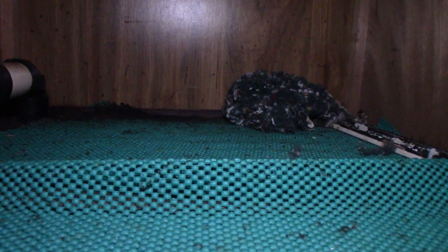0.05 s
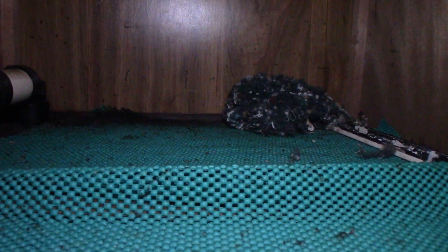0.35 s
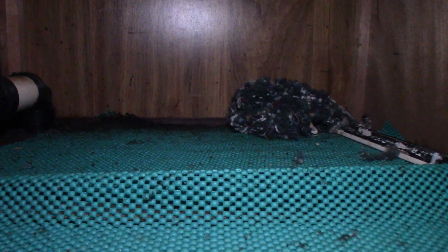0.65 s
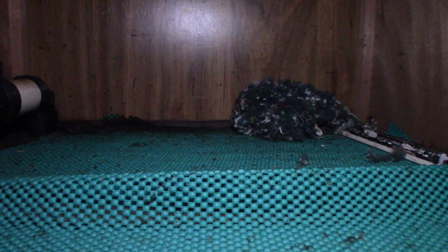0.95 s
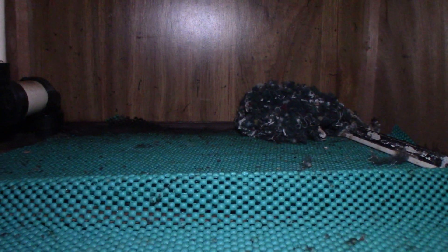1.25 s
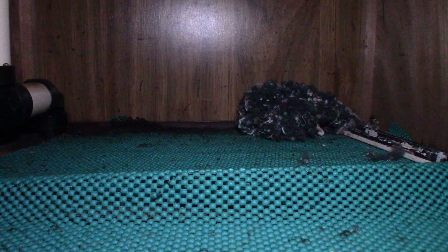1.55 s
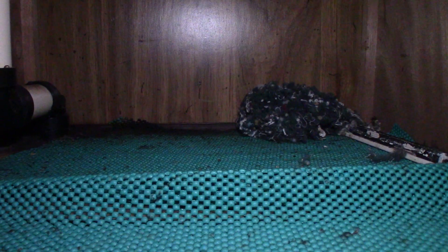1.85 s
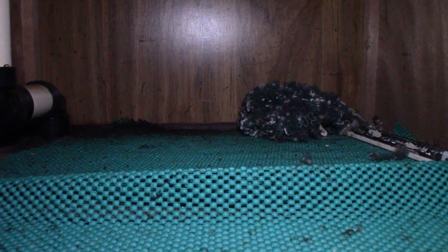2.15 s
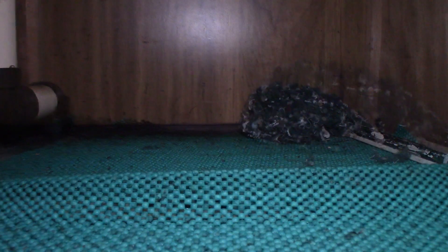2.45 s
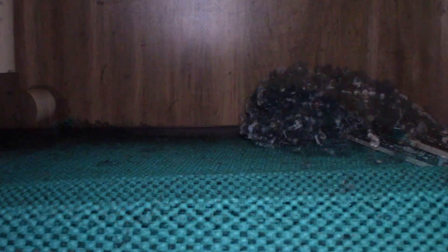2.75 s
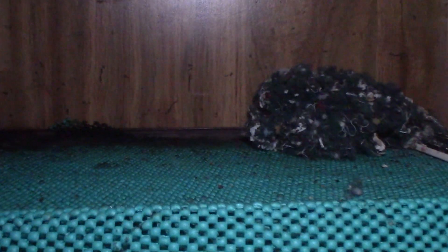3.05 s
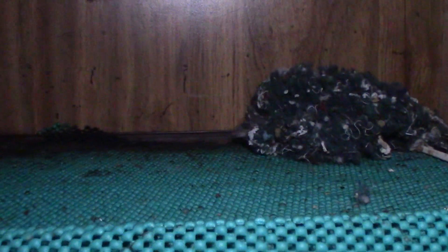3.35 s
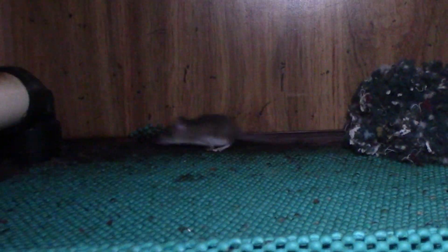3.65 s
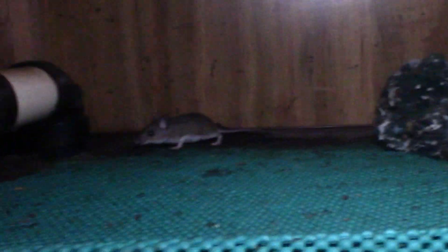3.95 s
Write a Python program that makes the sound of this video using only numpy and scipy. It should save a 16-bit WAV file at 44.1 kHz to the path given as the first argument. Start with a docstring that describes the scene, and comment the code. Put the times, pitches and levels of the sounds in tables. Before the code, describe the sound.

Hands shift a camera, with rumbling, scraping, clicks and a thump right at the microphone, mostly left. The quiet wooden room hums underneath. The handling settles, a few faint mouse steps pass, and a last bump jolts the camera.

```python
"""Camera handling in a wooden cabin

Hands shift a camera in a small wooden cabin: its plastic body rumbles, rubs and clicks near the left
microphone, and close walls scatter the sound. Quiet room noise and a low hum lie underneath.
A mouse patters faintly along the wall; at the end a bump shakes the camera and its support."""
import sys
import numpy as np
from scipy import signal
from scipy.fft import rfft, irfft
from scipy.io import wavfile
from scipy.ndimage import uniform_filter1d, minimum_filter1d

SR = 44100
rng = np.random.default_rng(int(sys.argv[2]) if len(sys.argv) > 2 else 0)


def wav_out(sig):
    """Save sig, one row per channel (or a flat mono array), as 16-bit PCM at SR to the path in sys.argv[1]."""
    wavfile.write(sys.argv[1], SR, np.round(np.clip(np.atleast_2d(sig).T, -1, 1) * 32767).astype(np.int16))


N = 176400
RING_SAMPLES = 13230
ROOM_PAN_DB = 3.5
# Modes of the plastic body. Each row: frequency in Hz, level in dB, T60 in seconds.
BODY_MODES = [(269, 3.5, 0.03), (328, 6, 0.03), (525, 3.5, 0.015), (835, 3, .019), (1117, 0.5, .02),
              (1400, -0.5, 0.013), (1810, -7, 0.012), (2600, -0.5, 0.0088), (3200, 5.5, 0.0065),
              (3600, -12.5, .017), (4460, -10.5, 0.013), (6600, 6, 0.0029)]


def undb(db):
    """Decibels to gain."""
    return 10 ** (np.asarray(db) / 20)


def unit(x):
    """Scale to rms 1."""
    return x / np.sqrt(np.mean(x ** 2) + 1e-20)


def decay(t, t60_s):
    """Exponential fall, 60 dB per t60_s."""
    return np.exp(-np.log(1000) * t / t60_s)


def pan(db):
    """Channel gains for left minus right in dB."""
    gains = undb(np.array([[db], [-db]]) / 2)
    return gains / gains.mean()


def add(out, start_s, x):
    """Mix x in at start_s."""
    i = max(int(start_s * SR), 0)
    out[:, i:i + x.shape[-1]] += x[..., :max(N - i, 0)]


def butter(x, order, hz, kind="low"):
    """Butterworth filter."""
    return signal.sosfilt(signal.butter(order, hz, kind, fs=SR, output="sos"), x)


def band(x, low_hz, high_hz, skirt_db=-17):
    """Band-pass with a weak, broad skirt."""
    top_hz = min(max(high_hz, low_hz * 1.1), SR / 2.2)
    skirt_hz = [low_hz / 4, min(top_hz * 2.2, SR / 2.2)]
    return butter(x, 2, [low_hz, top_hz], "band") + undb(skirt_db) * butter(x, 2, skirt_hz, "band")


def colour(x, points):
    """Filter by (Hz, dB) points; 12 dB/octave roll-off below the first."""
    hz, db = np.array(points).T
    f = np.maximum(np.fft.rfftfreq(N, 1 / SR), 1)
    gain = undb(np.interp(np.log(f), np.log(hz), db)) * np.minimum(f / hz[0], 1) ** 2
    return irfft(rfft(x) * gain, N)


def stereo_noise(count, apart_db):
    """Shared noise plus an independent part per channel at apart_db."""
    return unit(rng.standard_normal(count) + undb(apart_db) * rng.standard_normal((2, count)))


def through(x, response):
    """Convolve both channels, keeping the length."""
    return signal.fftconvolve(x, np.atleast_2d(response), axes=1)[:, :x.shape[1]]


def ring(modes):
    """Impulse response of decaying modes."""
    t = np.arange(RING_SAMPLES) / SR
    return sum(undb(db) * decay(t, t60_s) * np.cos(2 * np.pi * hz * t) for hz, db, t60_s in modes)


def hit_level(x, db):
    """Scale a hit to the energy of 2 ms at db rms."""
    return unit(x) * np.sqrt(0.002 * SR / x.shape[-1]) * undb(db)


def grip(at_s):
    """Channel gains for the finger position."""
    # Each row: time in seconds, left minus right in dB.
    sides = [(1.4, 7.5), (1.8, 10), (2.25, 10), (3.9, 2)]
    return pan(np.interp(at_s, *np.array(sides).T))


def body_response(tick_db=32.5, top_hz=10700):
    """A tick and the brief ring of the plastic, which damps the top treble."""
    response = ring(BODY_MODES)[:RING_SAMPLES // 4]
    response[0] = response[0] / 2 + undb(tick_db)
    return butter(response, 2, top_hz)


def wall_response(bass_t60_s=0.11, treble_t60_s=0.055, rise_s=0.00053):
    """Short scatter between close wooden walls; treble dies first."""
    t = np.arange(RING_SAMPLES // 2) / SR
    noise = stereo_noise(len(t), apart_db=4)
    dull = butter(noise, 1, hz=6000)
    scatter = dull * decay(t, bass_t60_s) + (noise - dull) * decay(t, treble_t60_s)
    return unit(scatter * (1 - np.exp(-t / rise_s))) / np.sqrt(len(t))


def room(t, air_db=-47.5, diffuse_hz=3200, hum_hz=77):
    """Quiet air, shared in the bass and diffuse in the treble, with a low hum."""
    # Each row: frequency in Hz, relative spectral density in dB.
    air_spectrum = [(71, -29), (120, -10), (150, -1.5), (267, -2), (321, -3.5), (427, -4), (524, -6),
                    (580, -7), (14400, -31.5), (16000, -42)]
    # Each row: time in seconds, level in dB.
    hum_levels = [(0, -72), (1.1, -45.5), (2.5, -48), (3.1, -45.5), (3.75, -36.5), (4, -42)]
    f = np.fft.rfftfreq(N, 1 / SR)
    diffuse_share = np.clip(0.089 + 0.4 * f ** 1.659 / (f ** 1.56 + diffuse_hz ** 1.5), 0, 1)
    shared = rfft(rng.standard_normal(N)) * np.sqrt(1 - diffuse_share)
    diffuse = rfft(rng.standard_normal((2, N))) * np.sqrt(diffuse_share)
    air = unit(colour(irfft(shared + diffuse, N), air_spectrum)) * undb(air_db)
    hum = np.sin(2 * np.pi * hum_hz * t) * undb(np.interp(t, *np.array(hum_levels).T))
    return (air + hum) * pan(ROOM_PAN_DB)


def rumble(t):
    """The held camera trembles."""
    # Each row: time in seconds, level in dB.
    levels = [(0, -38.5), (.45, -41.5), (.62, -48), (.78, -33.5), (1.15, -36.5), (1.55, -43.5),
              (1.8, -29.5), (2.1, -33.5), (2.25, -32), (2.5, -35), (2.76, -43.5), (2.88, -33),
              (3.12, -37.5), (3.35, -41), (4, -37)]
    # Each row: frequency in Hz, relative level in dB.
    spectrum = [(12, -2.5), (22, 4), (37, 2.5), (55, -7.5), (80, -7.5), (120, -14.5), (200, -26),
                (500, -62.5)]
    tremble = unit(colour(stereo_noise(N, apart_db=-4.5), spectrum))
    return tremble * undb(np.interp(t, *np.array(levels).T)) * pan(db=3)


def stick_slip(x, t, centre_hz=706.5, drift_depth=0.11, drift_hz=2.9, repeat_gain=0.55):
    """Each catch recurs one slip later; the slip rate drifts along the stroke."""
    slip_hz = centre_hz * np.exp(drift_depth * np.sin(2 * np.pi * (drift_hz * t + rng.random())))
    return x + repeat_gain * np.array([np.interp(t - 1 / slip_hz, t, side) for side in x])


def rubs(walls, grains_per_s=700, grain_spread_db=4.5, echo_db=-6.5):
    """Sliding skin catches in dense, uneven grains that ring the body and the walls."""
    # Each row: start in seconds, length in seconds, level in dB, low and high edge in Hz.
    strokes = [(0, 0.48, -55, 2200, 6960), (0.4, 0.66, -55.5, 2240, 6000), (0.175, 0.086, -37.5, 213, 390),
               (0.15, 0.24, -62.5, 6760, 8250), (0.677, 0.16, -36, 217, 370),
               (0.715, 0.041, -53, 6000, 13000), (0.731, 0.051, -43, 5370, 7250),
               (0.768, 0.069, -38.5, 500, 3200), (0.81, 0.17, -50.5, 1490, 10000),
               (0.717, 0.32, -39.5, 62.7, 160), (1.301, 0.077, -40.5, 680, 6000),
               (1.441, 0.044, -41.5, 200, 4930), (1.606, 0.32, -45.5, 500, 6000),
               (1.658, 0.073, -38, 1180, 4960), (1.687, 0.1, -50.5, 4500, 13000),
               (1.73, 0.17, -36.5, 170, 594), (1.967, 0.078, -39, 273, 1950),
               (2.123, 0.062, -49, 900, 8000), (2.177, 0.15, -40.5, 195, 1900),
               (2.429, 0.048, -44.5, 490, 4840)]
    out, t, body = np.zeros((2, N)), np.arange(SR) / SR, body_response()
    for start_s, length_s, db, low_hz, high_hz in strokes:
        grain_db = grain_spread_db * np.clip(rng.standard_normal(SR), -2, 2)
        friction = stereo_noise(len(t), apart_db=-3) * undb(grain_db[(t * grains_per_s).astype(int)])
        scrape = through(stick_slip(friction, t), body)
        scrape = scrape + undb(echo_db) * through(scrape, walls)
        attack = np.clip(t / (0.1 * length_s), 0, 1)
        release = np.clip((length_s - t) / (0.34 * length_s), 0, 1)
        stroke = unit(band(scrape, low_hz, high_hz)) * attack * release
        add(out, start_s, stroke * undb(db) * grip(start_s))
    return out


def clicks(walls, chatter_db=-11.5, chatter_s=0.0012):
    """Each contact chatters briefly, rings the body and rattles between the walls."""
    # Each row: start in seconds, level in dB, low and high edge in Hz, rattle over direct in dB.
    contacts = [(0.7514, -25.5, 3780, 6600, 1), (0.7694, -29, 2470, 5700, -11),
                (0.831, -24.5, 910, 2650, 25), (0.911, -17, 1190, 2610, 1.5), (1.117, -26.5, 490, 1980, 12),
                (1.178, -38.5, 600, 4000, 8), (1.3072, -27.5, 600, 2800, 16),
                (1.3725, -23.5, 1280, 5470, 0.5), (1.422, -26.5, 1400, 6900, -7),
                (1.4455, -24, 790, 1230, -2.5), (1.496, -33, 910, 4000, 11),
                (1.655, -39.5, 2000, 13000, -20), (1.6599, -23, 660, 1670, 32),
                (1.713, -28.5, 876, 3440, 10), (1.7564, -22.5, 600, 3130, -4), (1.765, -21, 2500, 4800, -9),
                (1.798, -15.5, 570, 950, -25), (1.811, -10.5, 2690, 6200, -7),
                (1.895, -36.5, 3760, 14600, 2.5), (2.007, -31.5, 1200, 7200, 1),
                (2.043, -34, 1500, 4970, -3), (2.0754, -13, 3480, 6900, -11.5), (2.129, -19, 590, 1890, 7),
                (2.132, -30, 5460, 12800, -3), (2.157, -38, 3200, 7000, -12), (2.1853, -24, 2360, 5040, 0),
                (2.2276, -20.5, 2580, 4830, -11), (2.228, -24.5, 497, 1730, 2), (2.239, -32, 1160, 1420, 5),
                (2.256, -21.5, 1000, 2340, 0), (2.27, -32, 1200, 3820, -11), (2.284, -31, 885, 2970, 0),
                (2.306, -42, 1450, 7900, -9), (2.317, -34, 900, 2300, 6), (2.3481, -30.5, 596, 3200, 1),
                (2.41, -33.5, 870, 3380, 16), (3.887, -31, 2870, 5040, 0), (3.906, -28, 3470, 11900, -7),
                (3.9131, -26.5, 1280, 4300, -21), (3.917, -24, 1430, 1700, -3),
                (3.915, -20.5, 710, 855, -5)]
    out, t, body = np.zeros((2, N)), np.arange(RING_SAMPLES // 2) / SR, body_response()
    for start_s, db, low_hz, high_hz, rattle_db in contacts:
        chatter = undb(chatter_db) * stereo_noise(len(t), apart_db=5) * np.exp(-t / chatter_s)
        direct = unit(band(through((t == 0) + chatter, body), low_hz, high_hz))
        rattle = unit(band(through(walls, body), low_hz * 0.66, high_hz))
        click = direct + undb(rattle_db) * rattle
        add(out, start_s, hit_level(click * grip(start_s), db))
    return out


def knocks(walls, push_db=26, echo_db=-5.5):
    """A padded fingertip gives a dull push; body modes in its band ring briefly."""
    # Each row: start in seconds, level in dB, low and high edge in Hz.
    taps = [(0.912, -24, 1320, 3300), (1.102, -24, 497, 637), (1.799, -21, 515, 904),
            (2.131, -23, 1690, 2830), (2.133, -16.5, 277, 474), (2.187, -28.5, 2580, 3600),
            (2.193, -24.5, 507, 650)]
    out, response = np.zeros((2, N)), ring(BODY_MODES)
    response[0] = response[0] / 2 + undb(push_db)
    for start_s, db, low_hz, high_hz in taps:
        direct = band(response, low_hz, high_hz) * grip(start_s)
        add(out, start_s, hit_level(direct + undb(echo_db) * through(direct, walls), db))
    return out


def bumps(boom_db=-15.5, boom_t60_s=0.39):
    """Soft pushes shake the support and boom on in the wood; longer contact, duller thud."""
    # Each row: start in seconds, gain in dB, contact time in seconds.
    pushes = [(1.12, -26.5, 0.0087), (1.759, -4, 0.013), (2.216, -20.5, 0.012), (2.279, -20, .011),
              (3.8819, -24.5, 0.003), (3.906, -7, 0.0032), (3.9121, -15.5, 0.0019), (3.9281, -8.5, 0.005),
              (3.9450, -24.5, 0.0022), (3.984, -28.5, 0.0023)]
    # Camera on its support. Each row: frequency in Hz, level in dB, T60 in seconds.
    support_modes = [(39.6, -14, 0.32), (73.4, 2, 0.1), (136.4, 1.5, 0.088), (193, 2, 0.11),
                     (230.4, 5, 0.071), (350, -7, 0.11), (420, -9, 0.067), (777, 1.5, 0.062)]
    out, t, support = np.zeros((2, N)), np.arange(RING_SAMPLES) / SR, ring(support_modes)
    for start_s, db, contact_s in pushes:
        force = np.sin(np.pi * np.minimum(t / contact_s, 1)) ** 2
        thud = signal.fftconvolve(support, force / force.sum())
        add(out, start_s, thud * undb(db) * pan(db=2.5))
    tail = stereo_noise(len(t), apart_db=7.8) * decay(t, boom_t60_s)
    boom = unit(band(tail, low_hz=223, high_hz=980)) / np.sqrt(len(t))
    return out + undb(boom_db) * through(out, boom)


def mouse(t60_s=0.061):
    """Light footfalls, blurred by the wooden walls."""
    # Each row: start in seconds, level in dB, low and high edge in Hz.
    footfalls = [(3.497, -39, 445, 1180), (3.529, -38.5, 357, 590), (3.633, -42.5, 1250, 2040),
                 (3.703, -43.5, 497, 1770)]
    out, t = np.zeros((2, N)), np.arange(RING_SAMPLES) / SR
    for start_s, db, low_hz, high_hz in footfalls:
        noise = unit(band(stereo_noise(len(t), apart_db=6.7), low_hz, high_hz))
        add(out, start_s, noise * decay(t, t60_s) * undb(db) * pan(ROOM_PAN_DB))
    return out


def body_to_microphones(x):
    """Vibration through the body reaches the two microphones out of phase."""
    # Each row: frequency in Hz, lead of the right microphone in radians.
    phase_leads = [(30, 1.4), (70, 0.32), (140, 0.95), (260, -0.42), (500, 1.45), (1000, 0.74),
                   (4000, 0.33), (9000, -0.37)]
    lead_rad = np.interp(np.fft.rfftfreq(2 * N, 1 / SR), *np.array(phase_leads).T)
    right = irfft(rfft(x[1], 2 * N) * np.exp(1j * lead_rad))[:N]
    return np.array([x[0], right])


def scene():
    """All sources at the two microphones."""
    t, walls = np.arange(N) / SR, wall_response()
    handling = clicks(walls) + knocks(walls) + rubs(walls) + bumps()
    return body_to_microphones(handling) + rumble(t) + mouse() + room(t)


def record(dry):
    """Fast peak limiter, then a steep low-pass."""
    ceiling, window_s, top_hz = 0.96, 0.0035, 15900
    window = int(window_s * SR) | 1
    needed_gain = np.minimum(1, ceiling / (np.abs(dry).max(axis=0) + 1e-9))
    gain = uniform_filter1d(minimum_filter1d(needed_gain, window), window)
    return signal.sosfilt(signal.ellip(10, 0.1, 90, top_hz, fs=SR, output="sos"), dry * gain)


dry = scene()
out = record(dry)
wav_out(out)
```